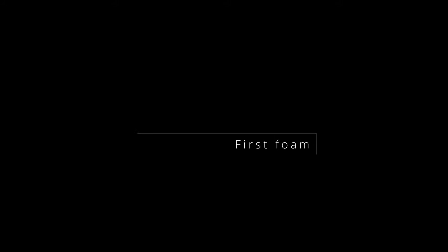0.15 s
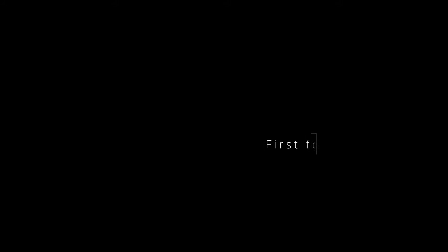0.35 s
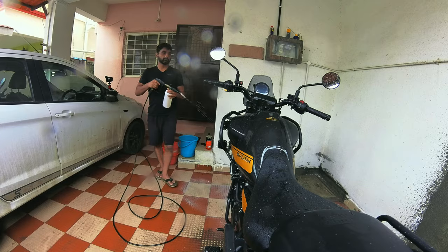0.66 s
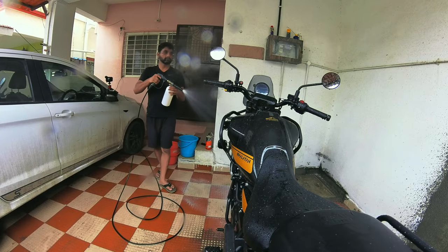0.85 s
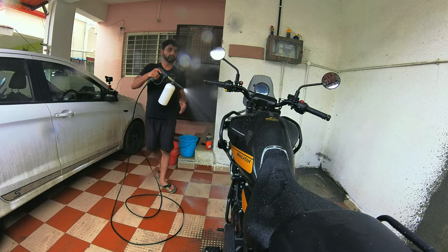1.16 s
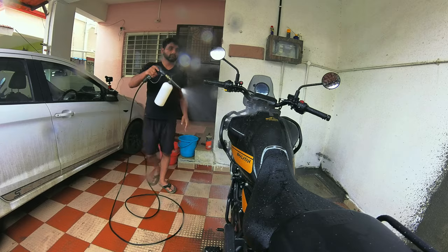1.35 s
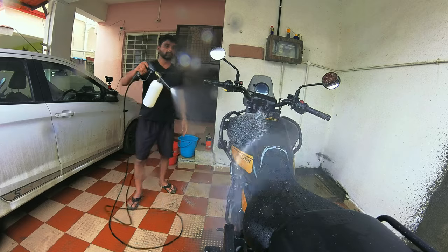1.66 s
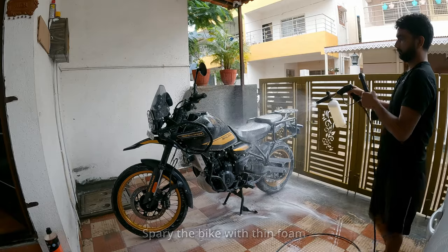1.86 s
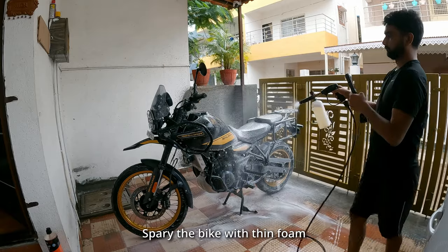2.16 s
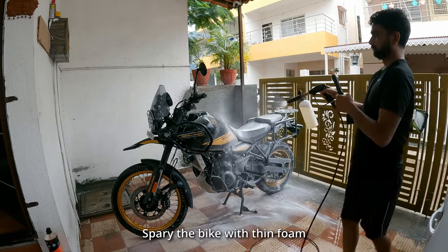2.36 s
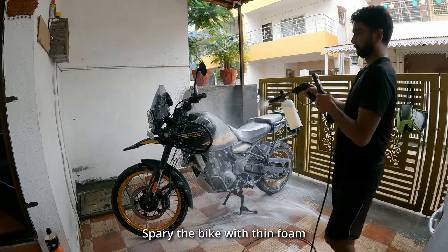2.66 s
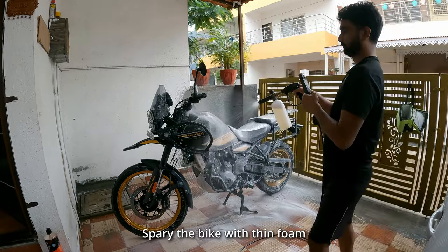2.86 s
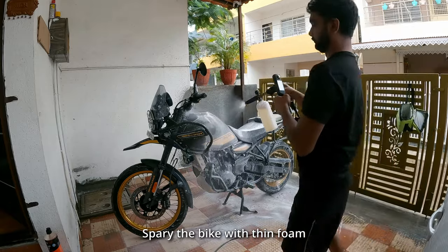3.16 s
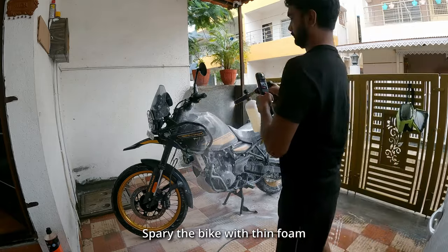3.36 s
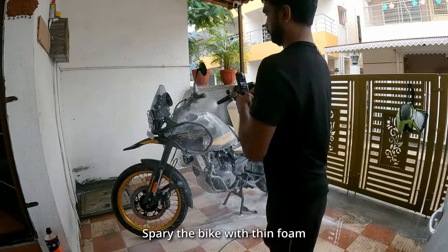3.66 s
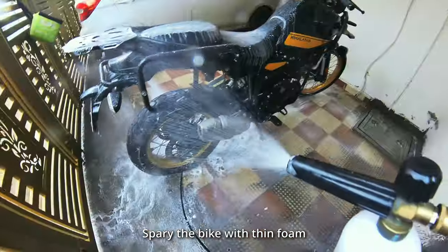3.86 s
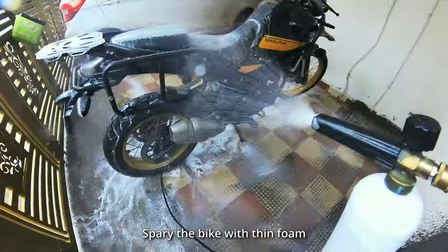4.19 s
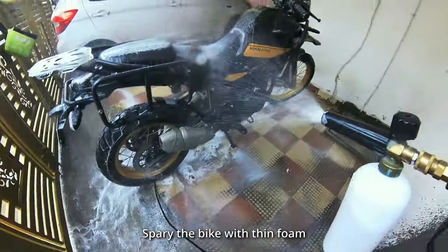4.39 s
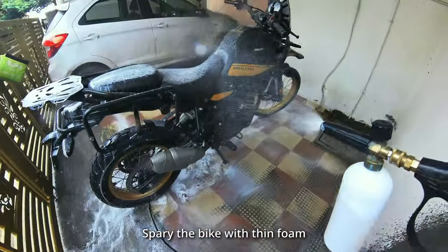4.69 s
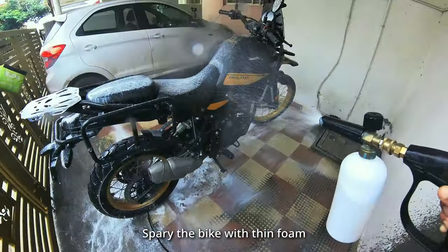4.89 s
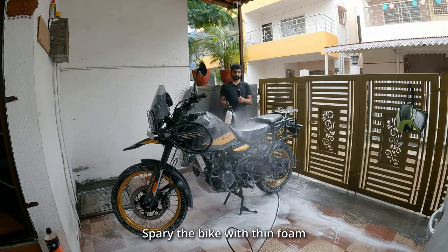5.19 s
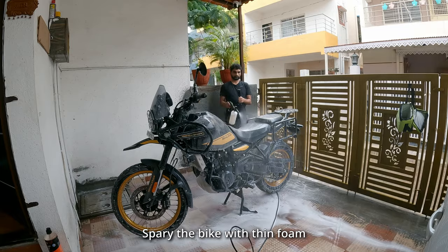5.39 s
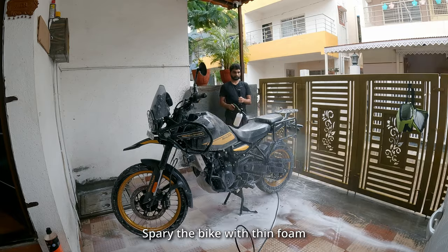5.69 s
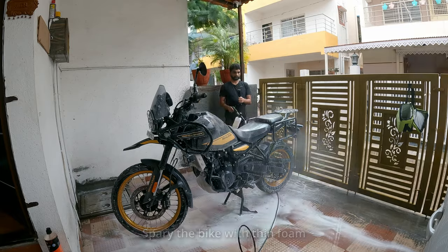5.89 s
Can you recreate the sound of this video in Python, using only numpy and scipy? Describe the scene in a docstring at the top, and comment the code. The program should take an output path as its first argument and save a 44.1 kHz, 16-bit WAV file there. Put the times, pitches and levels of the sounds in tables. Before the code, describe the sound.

In a hard-walled yard, one microphone hears a pressure washer start after brief silence: a short blip of noise, a clunk and a spurt, a quick motor rise, then continuous pump hum, low rumble and rapid clatter. A bright hiss and midrange rasp ride on top, shifting as the lance moves across the motorcycle. A quick cluster of thuds and splashy slaps comes around four seconds, and the spray continues to the end.

```python
"""Pressure washer foaming a motorcycle

An electric washer works in a walled yard, heard by one microphone: a noise burst, then the trigger frees a spurt.
The motor spins up the three-piston pump, whose tones swell and fade among the walls over rumble and clatter.
Shaped noise makes the foam lance hiss and rasp; narrow noise bands ring as the jet plays on parts.
Low noise swells and decaying modes make the spray thud and slap on the bodywork."""
import sys
import numpy as np
from scipy import signal
from scipy.fft import rfft, irfft, next_fast_len
from scipy.io import wavfile
from scipy.ndimage import uniform_filter1d, map_coordinates

SR = 44100
rng = np.random.default_rng(int(sys.argv[2]) if len(sys.argv) > 2 else 0)


def output_pcm(signal):
    """Save a mono or channel-first signal as 16-bit PCM at the path in sys.argv[1].

    Samples are clipped to [-1, 1] before scaling.
    """
    pcm = np.clip(np.atleast_2d(signal).T, -1, 1) * 32767
    wavfile.write(sys.argv[1], SR, np.round(pcm).astype(np.int16))


N = 266231

# moments and lengths in seconds that several sounds share
OPENING_S, VALVE_S, SNAP_S = 0.528, 0.647, 0.002
MOTOR_ON_S, SPIN_UP_S = 0.66, 0.19  # the motor gathers speed evenly
LOAD_ON_S, LOAD_RISE_S = 0.813, 0.056  # the pump takes up its load
JET_ON_S, BUILD_S = 0.831, 0.12  # then the pressure builds evenly


def amp(db):
    """Decibels to gain."""
    return 10 ** (np.asarray(db) / 20)


def unit(x):
    """Scale to rms 1."""
    return x / np.sqrt(np.mean(x ** 2) + 1e-20)


def ramp(start_s, length_s):
    """An even rise from 0 to 1."""
    return np.clip((np.arange(N) / SR - start_s) / length_s, 0, 1)


def swell(s, half_length_s):
    """A bell of height 1 around a moment, down to 1/e at the half length."""
    return np.exp(-((np.arange(N) / SR - s) / half_length_s) ** 2)


def burst(start_s, hold_s, fall_db_per_s):
    """A snap open, a hold and an even fall in dB."""
    fall_time = np.maximum(np.arange(N) / SR - start_s - hold_s, 0)
    return ramp(start_s, SNAP_S) * amp(-fall_db_per_s * fall_time)


def curves(rows):
    """One value per sample for each column after the time."""
    s, *cols = np.transpose(rows)
    return [np.interp(np.arange(N) / SR, s, c) for c in cols]


def wobble(rate):
    """A smooth random curve, rate knots a second."""
    knots = rng.standard_normal(int(N * rate / SR) + 4)
    return map_coordinates(knots, [np.arange(N) * rate / SR])


def filtered(x, response):
    """x times a response of frequency."""
    m = next_fast_len(N + SR // 4)
    return irfft(rfft(x, m) * response(np.fft.rfftfreq(m, 1 / SR)), m)[..., :N]


def coloured(x, spectrum):
    """x through a body given as (Hz, dB) points, at rms 1."""
    f, db = np.transpose(spectrum)
    return unit(filtered(x, lambda hz: amp(np.interp(np.log(hz + 1), np.log(f), db))))


def turbulence(patchy_db):
    """White noise whose gain drifts in patches of time and frequency."""
    z = signal.stft(rng.standard_normal(N), nperseg=512)[2]
    field = uniform_filter1d(rng.standard_normal(z.shape), size=7, axis=0)
    field = uniform_filter1d(field, size=40, axis=1)
    return unit(signal.istft(z * amp(patchy_db * unit(field)), nperseg=512)[1][:N])


def droplets(rate):
    """Random tiny impacts of unequal size, rate a second."""
    return unit((rng.random(N) < rate / SR) * rng.standard_normal(N))


def narrow(hz, width_hz):
    """Noise in one resonance, whose centre may move."""
    lowpass = lambda f: 1 / (1 + (f / (0.6 * width_hz)) ** 2) ** 2.0
    a, b = filtered(rng.standard_normal((2, N)), lowpass)
    phase = 2 * np.pi * np.cumsum(hz * np.ones(N)) / SR
    return unit(a * np.cos(phase) + b * np.sin(phase))


BASS_CUT_HZ = 89  # struck parts are too small to radiate below this


def struck(blows, modes):
    """Each blow rings the modes of one body, a little differently every time; deep bass is weak."""
    out = np.zeros(N + SR)
    t = np.arange(SR // 4) / SR
    for s, blow_db in blows:
        for k, (hz, db, t60) in enumerate(modes):
            mode_hz = hz * (1 + 0.0097 * rng.standard_normal())
            onset = 1 - np.exp(-2 * hz * t)
            ring = (-1) ** k * np.sin(2 * np.pi * mode_hz * t) * onset
            decay = amp(blow_db + db + rng.standard_normal() - 60 * t / t60)
            out[int(s * SR):][:len(t)] += decay * ring
    return signal.sosfilt(signal.butter(2, BASS_CUT_HZ, "highpass", fs=SR, output="sos"), out[:N])


# The yard's background colour. Each row: frequency in Hz, level in dB per Hz.
YARD_COLOUR = [(29, -27), (50, -10.5), (267, -7), (343, -11), (620, -18), (1300, -35), (1600, -46),
               (8510, -47), (12000, -61), (15600, -94), (22000, -120)]


def yard():
    """A low bed of steady noise that opens with the burst."""
    return amp(-47.0) * ramp(OPENING_S, SNAP_S) * coloured(rng.standard_normal(N), YARD_COLOUR)


# Colour of the noise burst before the spray. Each row: frequency in Hz, level in dB per Hz.
OPENING_COLOUR = [(35, -38), (60, -12), (438, -9), (727, -13), (1130, -22), (1300, -20), (1600, -32),
                  (1880, -26.5), (8820, -33.5), (15000, -54)]
OPENING_DB, OPENING_HOLD_S, OPENING_FALL_DB_PER_S = -34, 0.029, 3000


def opening_burst():
    """A short burst of noise that snaps on, holds and stops almost at once."""
    level = amp(OPENING_DB) * burst(OPENING_S, OPENING_HOLD_S, OPENING_FALL_DB_PER_S)
    return level * coloured(rng.standard_normal(N), OPENING_COLOUR)


# Colour of the released pressure. Each row: frequency in Hz, level in dB per Hz.
SPURT_COLOUR = [(60, -38), (120, -11), (230, -3.5), (400, -8), (540, -1), (660, -1), (820, 0), (1200, -9.5),
                (1600, -11.5), (2150, -6.5), (2900, -14), (4000, -15.5), (5800, -16), (8000, -20.5),
                (11000, -29), (15000, -50)]
SPURT_DB, SPURT_HOLD_S, SPURT_FALL_DB_PER_S = -23.5, 0.019, 132
LEAK_LEAD_S, LEAK_REL_DB = 0.02, -27  # the leak's level is relative to the spurt


def spurt():
    """The valve weeps just before it opens, then the hose empties its stored pressure."""
    water = coloured(turbulence(patchy_db=1.5) + 0.51 * droplets(1800), SPURT_COLOUR)
    leak = amp(LEAK_REL_DB) * burst(VALVE_S - LEAK_LEAD_S, LEAK_LEAD_S, SPURT_FALL_DB_PER_S)
    release = burst(VALVE_S, SPURT_HOLD_S, SPURT_FALL_DB_PER_S)
    return amp(SPURT_DB) * (leak + release) * water


# Water hammer as the valve opens, then as the pump takes its load.
# Each row: start in seconds, nominal level in dB.
HAMMERS = [(0.647, -18), (0.824, -27), (0.845, -27)]
# What the gun and hose ring with.
# Each row: nominal frequency in Hz, level in dB relative to the blow, 60 dB decay in seconds.
GUN_MODES = [(196, -13, 0.07), (288, -4, 0.05), (480, -9, 0.044), (626, -2, 0.094), (820, -7, 0.04),
             (2210, -12, 0.025), (4100, -13, 0.012)]


def water_hammer():
    """Sudden changes of flow knock the gun and hose, which ring in decaying modes."""
    return struck(HAMMERS, GUN_MODES)


# The lance's ring as the hose empties.
# One row: centre in seconds, rms level in dB at the crest, half length in seconds, pitch in Hz, width in Hz.
LANCE_RING = (0.703, -31.5, 0.032, 2150, 520)


def lance_ring():
    """The emptying hose excites one narrow resonance of the lance."""
    s, db, length, hz, width = LANCE_RING
    return amp(db) * ramp(VALVE_S, SNAP_S) * swell(s, length) * narrow(hz, width)


# Colour of the hiss. Each row: frequency in Hz, level in dB per Hz.
HISS_COLOUR = [(1590, -30), (2700, -8), (3060, -6), (3570, -1.5), (4900, -3), (6400, 0.5), (7990, -6),
               (10500, -10), (13000, -24.5), (15600, -45)]
# The hiss follows the aim of the lance.
# Each row: time in seconds, rms level in dB at full pressure before flicker and dip.
HISS_LEVEL = [(0.95, -26.5), (1.4, -25), (1.7, -26), (1.92, -25), (2.25, -25), (2.75, -24.5), (3.3, -25.5),
              (3.76, -25.5), (3.86, -25), (3.9, -24.5), (4.07, -23.8), (4.16, -25), (4.36, -26),
              (4.62, -25.5), (5.0, -25.5), (5.5, -26.5), (6.04, -28)]
# The hiss dips briefly. One row: centre in seconds, change in dB, half length in seconds.
HISS_DIP = (3.836, -5, 0.007)
HISS_POWER = 0.92  # hiss grows as this power of pressure
MAINS_HISS_DB = -27  # hiss on tap pressure alone, relative to full pressure


def hiss():
    """Turbulence and droplets leave the lance, faintly on tap pressure, then with the pump's pressure."""
    jet = turbulence(patchy_db=0.8) + 0.46 * droplets(1500)
    on_tap = amp(MAINS_HISS_DB) * ramp(VALVE_S, SNAP_S)
    flow = np.maximum(ramp(JET_ON_S, BUILD_S) ** HISS_POWER, on_tap)
    dip_s, dip_db, dip_length = HISS_DIP
    flicker = amp(dip_db * swell(dip_s, dip_length) + 0.49 * wobble(22.04))
    return amp(curves(HISS_LEVEL)[0]) * flow * flicker * coloured(jet, HISS_COLOUR)


BUZZ_HZ, BUZZ_DB = 200, -45.5
INRUSH_S, INRUSH_DB, INRUSH_HALF_S = 0.85, -31.5, 0.047  # a surge added to the steady buzz


def buzz():
    """The motor's magnetic buzz, a wavering sine, strongest as it takes up the load."""
    surge = amp(INRUSH_DB) * swell(INRUSH_S, INRUSH_HALF_S)
    level = ramp(MOTOR_ON_S, SNAP_S) * (amp(BUZZ_DB) + surge)
    phase = 2 * np.pi * BUZZ_HZ * np.arange(N) / SR + 0.84 * wobble(12)
    return np.sqrt(2) * level * np.sin(phase)


SHAFT_HZ = 47.17  # turns a second of the induction motor under load
IDLE_SHARE = 0.17  # the pump's sound before it takes up its load


def pump_motion():
    """The motor's relative speed, the pump's effort as its load comes on, and the shaft angle."""
    speed = ramp(MOTOR_ON_S, SPIN_UP_S)
    effort = speed * (IDLE_SHARE + (1 - IDLE_SHARE) * ramp(LOAD_ON_S, LOAD_RISE_S))
    return speed, effort, 2 * np.pi * np.cumsum(SHAFT_HZ * speed) / SR


def piston_strokes(angle):
    """Gain that pulses three times a turn, one piston knocking harder than the others."""
    return amp(1.1 * np.cos(3 * angle) + 0.37 * np.cos(angle))


# Places the yard is heard from. Each row: start in seconds, then the levels in dB
# of housing rumble at full speed, pump clatter under load and fine drops at full pressure.
PLACES = [(0, -33.5, -29.5, -40), (1.79, -32.3, -28, -55), (3.85, -30.5, -29, -58), (4.97, -30, -29, -45)]
MOVE_S = 0.038  # glide from one place to the next


def place_gains():
    """Gains of rumble, clatter and fine drops, steady at each listening place."""
    starts, *levels = np.transpose(PLACES)
    here = np.searchsorted(starts[1:], np.arange(N) / SR)
    return amp(uniform_filter1d(np.array(levels)[:, here], int(MOVE_S * SR), axis=1))


# Tones of the pump. Each row: shaft order, rms level in dB under load before lifts and wavering.
PUMP_TONES = [(3, -40.5), (4, -44), (5, -43.5), (6, -42), (8, -52), (9, -46), (12, -48.5), (13, -48.5),
              (14, -37), (15, -39), (16, -41), (17, -41.5), (18, -43), (20, -54), (26, -45.5), (39, -45),
              (40, -46), (44, -44)]
# Standing waves between the walls lift or sink one tone for a while.
# Each row: shaft order, start in seconds, end in seconds, change in dB.
LIFTS = [(3, 0.99, 1.77, 5), (3, 1.45, 1.6, 4), (6, 0.87, 1.79, 11), (9, 0.76, 1.8, 11.5),
         (12, 0.8, 1.8, 10), (14, 0.78, 1.87, 3.5), (17, 0.85, 2.1, 3), (18, 1.8, 3.1, 6.5),
         (16, 2, 3.0, 5), (15, 2.04, 3.8, 5), (6, 2.07, 3.05, -5), (9, 2.33, 3.82, 13.5),
         (14, 3.15, 3.85, 5), (6, 3.63, 6.3, 8.5), (3, 4.05, 6.3, -5), (18, 3.9, 3.9, -12),
         (13, 4.42, 4.72, 13), (14, 4.6, 4.9, -4), (15, 4.55, 5.6, 4), (12, 4.98, 6.3, 14), (6, 5.2, 6, 2)]
LIFT_FADE_S = 0.086  # a lift's rise and fall
TONE_DRIFT_RAD = 0.46  # random wander of each tone's phase
FADING_DB, FLUTTER_DB = 0.8, 1.6  # slow and fast wavering of each tone


def hum():
    """Shaft orders of the pump, each wavering, and lifted or sunk by the walls."""
    _, effort, angle = pump_motion()
    out = np.zeros(N)
    for order, db in PUMP_TONES:
        lift_db = 0
        for k, start, end, change_db in LIFTS:
            if round(k) == round(order):
                rise = ramp(start - LIFT_FADE_S / 2, LIFT_FADE_S)
                fall = ramp(end - LIFT_FADE_S / 2, LIFT_FADE_S)
                lift_db = lift_db + change_db * (rise - fall)
        phase = round(order) * angle + 2 * np.pi * rng.random() + TONE_DRIFT_RAD * wobble(9)
        waver_db = FADING_DB * wobble(3.97) + FLUTTER_DB * wobble(28)
        out += np.sqrt(2) * amp(db + lift_db + waver_db) * np.sin(phase)
    return effort * out


# Colour of the housing rumble. Each row: frequency in Hz, level in dB per Hz.
RUMBLE_COLOUR = [(20, -35), (40, -29), (85, -21), (115, -13.5), (150, -7), (230, -2), (330, 1), (430, -3),
                 (600, -10.5), (1200, -68)]
RUMBLE_POWER = 0.93  # rumble grows as this power of speed


def rumble():
    """The housing rumbles as low, patchy noise that grows with motor speed."""
    speed = pump_motion()[0]
    return place_gains()[0] * speed ** RUMBLE_POWER * coloured(turbulence(patchy_db=1.5), RUMBLE_COLOUR)


# Colour of the pump clatter. Each row: frequency in Hz, level in dB per Hz.
CLATTER_COLOUR = [(250, -27), (400, -6.5), (475, -3), (540, -2), (680, -3), (800, -4), (920, -3),
                  (1200, -7.5), (1560, -14.5), (2200, -16.5), (5000, -45)]


def clatter():
    """Each piston stroke pulses the pump's noise, which grows as the load comes on."""
    _, effort, angle = pump_motion()
    knocks = piston_strokes(angle) * turbulence(patchy_db=0.5)
    return effort * place_gains()[1] * coloured(knocks, CLATTER_COLOUR)


# A hollow tone that shifts with the aim of the lance.
# Each row: time in seconds, centre in Hz, rms level in dB under full load.
HOLLOW = [(0.88, 683, -28), (1.2, 673, -41), (1.75, 718, -46.5), (1.97, 820, -31.5), (2.3, 786, -41),
          (3.7, 741.3, -41), (4.2, 662, -29.5), (4.6, 700.4, -32), (4.82, 728, -27.5), (4.95, 747.4, -33),
          (5.26, 765, -31), (5.5, 768, -40), (6.04, 692, -35)]
HOLLOW_WIDTH_HZ = 92


def hollow_tone():
    """The jet sweeps past cavities: one narrow noise band whose pitch and level glide."""
    hz, db = curves(HOLLOW)
    return ramp(LOAD_ON_S, LOAD_RISE_S) * amp(db) * narrow(hz, HOLLOW_WIDTH_HZ)


# Colour of the rasp. Each row: frequency in Hz, level in dB per Hz.
RASP_COLOUR = [(1100, -23.5), (1600, -14), (1850, -6), (2030, 2.5), (2180, 1.5), (2400, -4), (2800, -14),
               (4000, -51)]
# The rasp's course. Each row: time in seconds, rms level in dB at full pressure.
RASP_LEVEL = [(0.95, -32.5), (1.3, -34), (1.95, -31), (3.1, -31), (3.55, -31), (4.05, -30), (4.3, -30.5),
              (5.25, -29.5), (5.85, -29.5), (6.04, -33)]
RASP_POWER = 0.48  # rasp grows as this power of pressure


def rasp():
    """The foam lance rasps as the piston strokes pulse its turbulence."""
    angle = pump_motion()[2]
    pulsed = piston_strokes(angle) * turbulence(patchy_db=1.1)
    level = amp(curves(RASP_LEVEL)[0]) * ramp(JET_ON_S, BUILD_S) ** RASP_POWER
    return level * coloured(pulsed, RASP_COLOUR)


FIZZ_POWER = 3.0  # fizz grows as this power of pressure


def fizz():
    """Fine drops land as a bright, wavering patter that grows steeply with the jet's pressure."""
    level = place_gains()[-1] * ramp(JET_ON_S, BUILD_S) ** FIZZ_POWER * amp(1.2 * wobble(5.25))
    colour = [(4000, -35), (8500, -8.0), (10700, 1), (13000, -10), (15500, -24)]  # Hz, dB per Hz
    return level * coloured(droplets(5000), colour)


# The jet plays on parts that ring narrowly. Each row: centre in seconds, rms level in dB at the crest,
# half length in seconds, nominal pitch in Hz, width in Hz.
RINGS = [(1.28, -37.5, 0.22, 5200, 900), (1.5, -46, 0.18, 11800, 2970), (1.673, -32, 0.057, 2160, 120),
         (1.904, -32, 0.12, 6160, 1100), (2.172, -36.5, 0.075, 1240, 150), (2.244, -34, 0.25, 6570, 448),
         (2.58, -34.5, 0.07, 6050, 500), (2.78, -29.5, 0.045, 6200, 646), (2.8, -38, 0.94, 3516, 300),
         (3.04, -37, 0.08, 6260, 500), (3.04, -34, 0.037, 2086, 120), (3.26, -34, 0.05, 3700, 706),
         (3.68, -33, 0.1, 6150, 451), (3.98, -35, 0.13, 7000, 1998), (4.32, -34, 0.12, 531, 90),
         (4.684, -33, 0.081, 1980, 110), (4.75, -34, 0.2, 6200, 601.7), (4.91, -32, 0.041, 2045, 110.4),
         (5.02, -32.5, 0.06, 2300, 130), (5.203, -39, 0.41, 1340, 398), (5.519, -33, 0.31, 2123, 130),
         (5.592, -34, 0.065, 1440, 90), (5.6, -35, 0.25, 4100, 600), (5.68, -31, 0.15, 288, 70.3),
         (5.87, -30, 0.17, 403, 160.3)]
# A thin, broken whistle as the jet grazes the bodywork. Each row: centre in seconds,
# rms level in dB at the crest, half length in seconds, nominal pitch in Hz, width in Hz.
WHISTLES = [(3.925, -39, 0.025, 11100, 1400), (3.97, -39, 0.051, 9700, 400), (4.342, -40, 0.08, 9300, 380),
            (4.52, -37, 0.07, 9220, 350), (4.76, -43, 0.12, 9600, 450)]
RING_WANDER = 0.008  # the resonances drift by about this share as the hand moves


def ringing():
    """The jet sweeps past metal parts and bodywork, each colouring the spray for a moment."""
    drift = 1 + RING_WANDER * wobble(6)
    parts = np.zeros(N)
    for s, db, length, hz, width in RINGS + WHISTLES:
        parts += amp(db) * swell(s, length) * narrow(hz * drift, width)
    return ramp(JET_ON_S, BUILD_S) * parts


# Spray drums on panels. Each row: centre in seconds, rms level in dB at the crest,
# half length in seconds, centre frequency in Hz.
DRUMS = [(1.81, -42, 0.031, 90), (2.306, -40, 0.044, 49.6), (3.858, -24.5, 0.028, 300),
         (3.915, -27, 0.042, 229.8), (4.429, -44, 0.042, 60), (5.05, -50, 0.044, 49.85),
         (5.33, -31.5, 0.023, 119.6), (5.6, -43, 0.2, 52)]


def drumming():
    """Dull thuds, low noise swells, as the jet and the air it drags hit hollow panels."""
    out = np.zeros(N)
    for s, db, length, hz in DRUMS:
        colour = [(hz / 4, -38), (hz * 0.71, -2), (hz, 0), (hz * 3, -14), (hz * 12, -45)]
        out += amp(db) * swell(s, length) * coloured(rng.standard_normal(N), colour)
    return out


# The jet slaps a hollow panel. Each row: start in seconds, nominal level in dB.
SLAPS = [(3.844, -16), (3.861, -18), (3.877, -14), (3.908, -17), (3.938, -21), (3.96, -23)]
# What the panel rings with.
# Each row: nominal frequency in Hz, level in dB relative to the slap, 60 dB decay in seconds.
PANEL_MODES = [(147, -6.5, 0.11), (270, -2.5, 0.09), (366, -6, 0.056), (568, -1, 0.05), (694, -7, 0.055),
               (835, -5.5, 0.044), (2040, -8, 0.067)]


def slaps():
    """The jet's slaps ring the decaying modes of a hollow panel."""
    return struck(SLAPS, PANEL_MODES)


# The first slaps splash. One row: centre in seconds, rms level in dB at the crest, half length in seconds.
SPLASH = (3.857, -27, 0.015)
# Colour of the splash. Each row: frequency in Hz, level in dB per Hz.
SPLASH_COLOUR = [(600, -20), (1150, -9), (1650, -10), (2300, -3), (3000, 3), (3400, -13), (4200, -30),
                 (7000, -70)]


def splash():
    """Water thrown up by the first slaps, a brief swell of noise."""
    s, db, length = SPLASH
    return amp(db) * swell(s, length) * coloured(rng.standard_normal(N), SPLASH_COLOUR)


def scene():
    """Silence, then the yard with the washer, alike in both channels."""
    release = spurt() + water_hammer() + lance_ring()
    machine = buzz() + hum() + rumble() + clatter()
    spray = hiss() + rasp() + fizz()
    bodywork = hollow_tone() + ringing() + drumming() + slaps() + splash()
    mono = yard() + opening_burst() + release + machine + spray + bodywork
    return np.array([mono, mono])


TOP_HZ = 15700  # band limit


def record(dry):
    """The microphone's channel keeps nothing above its band limit."""
    return filtered(dry, lambda hz: hz < TOP_HZ)


dry = scene()
out = record(dry)
output_pcm(out)
```